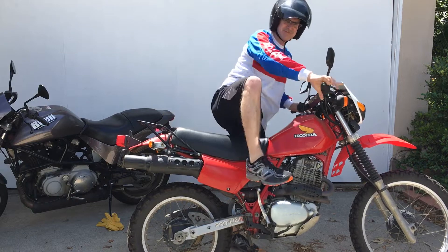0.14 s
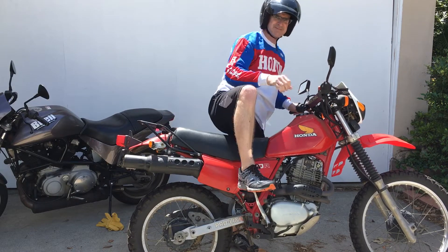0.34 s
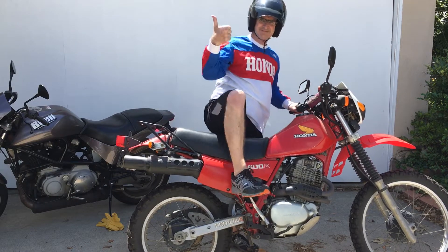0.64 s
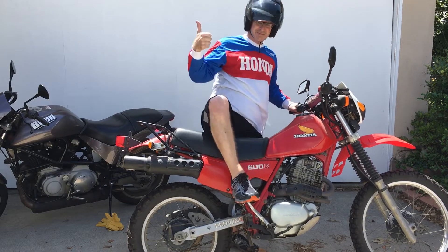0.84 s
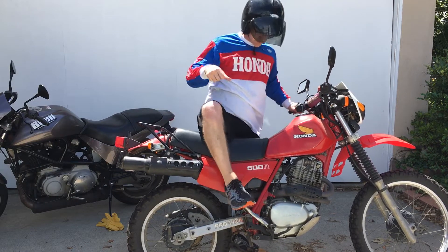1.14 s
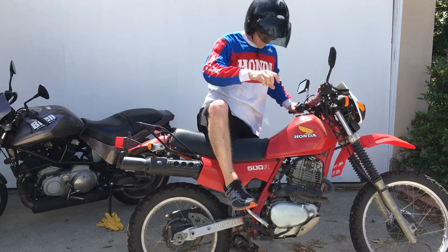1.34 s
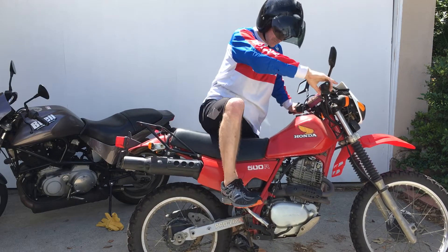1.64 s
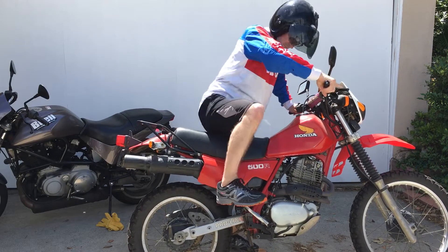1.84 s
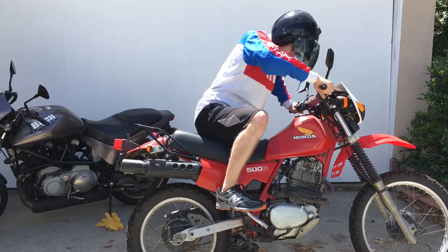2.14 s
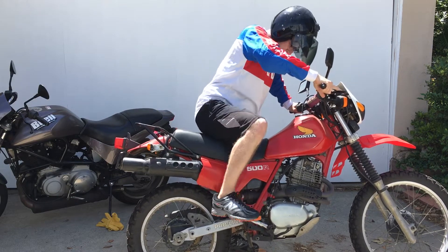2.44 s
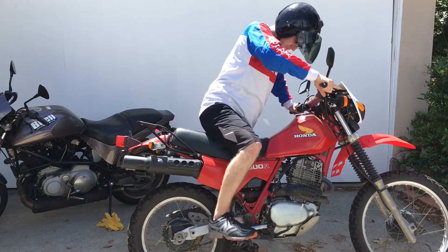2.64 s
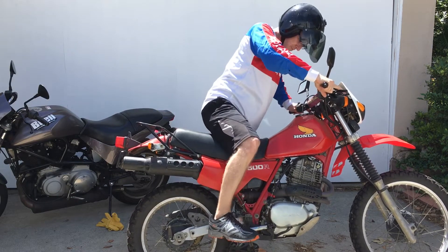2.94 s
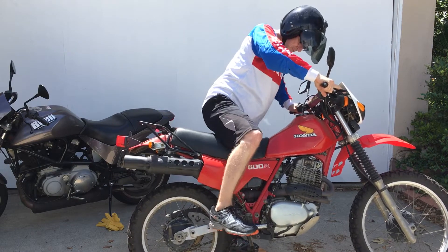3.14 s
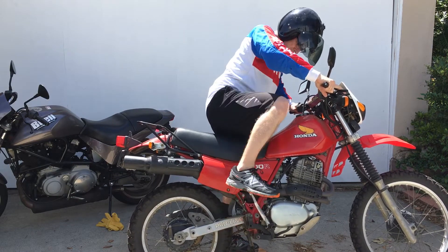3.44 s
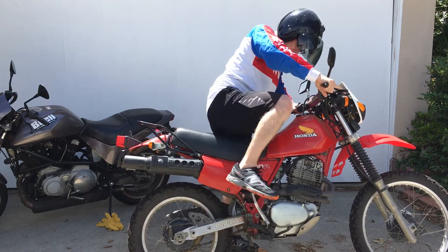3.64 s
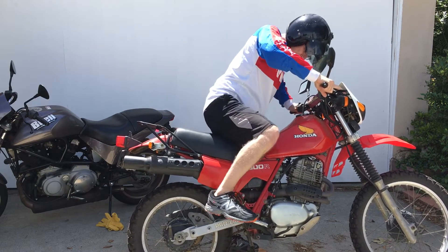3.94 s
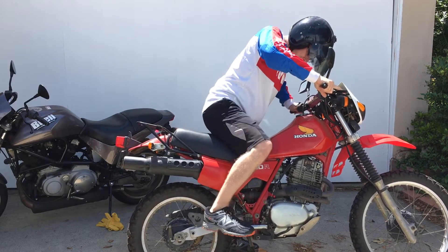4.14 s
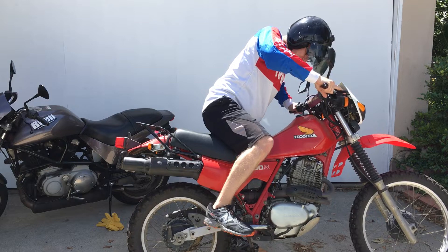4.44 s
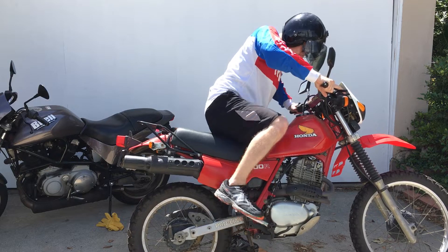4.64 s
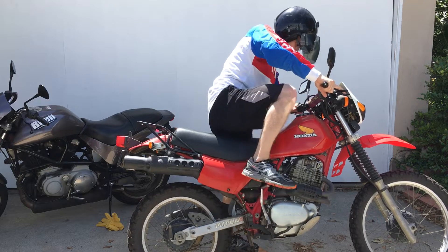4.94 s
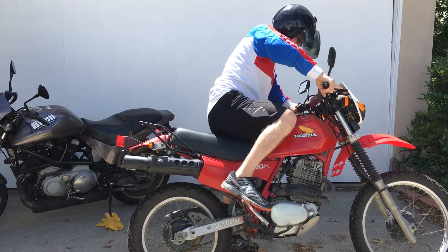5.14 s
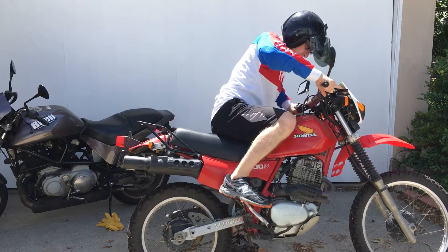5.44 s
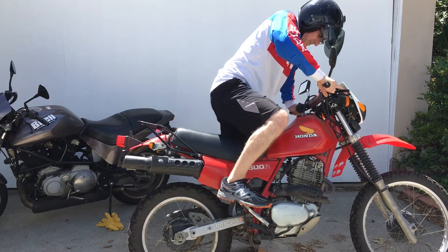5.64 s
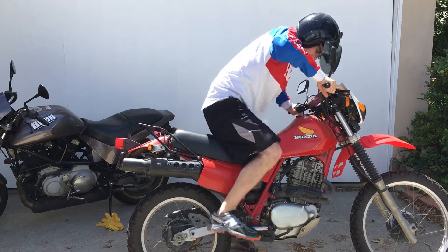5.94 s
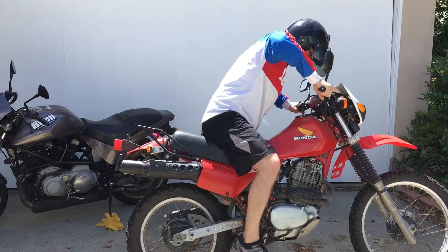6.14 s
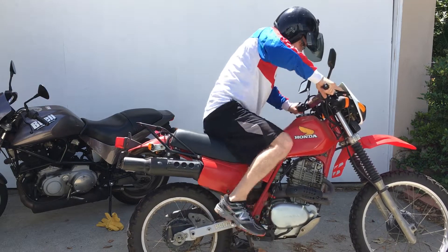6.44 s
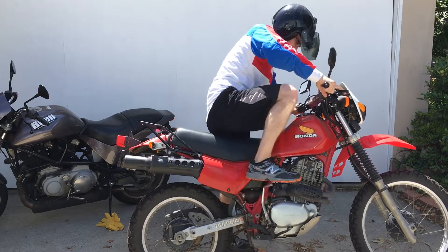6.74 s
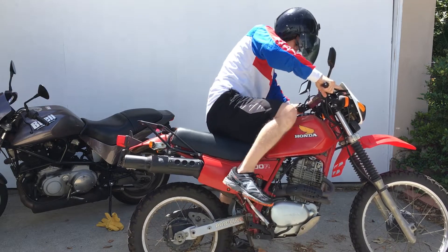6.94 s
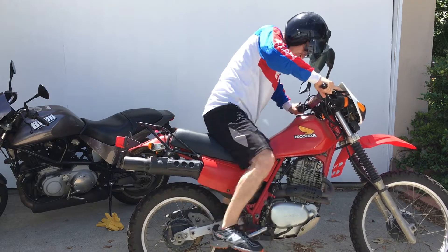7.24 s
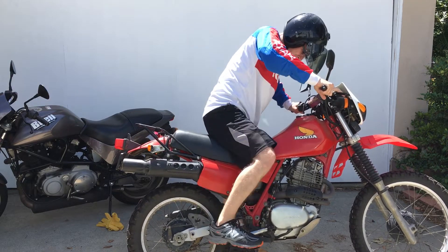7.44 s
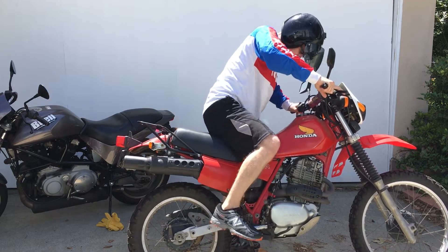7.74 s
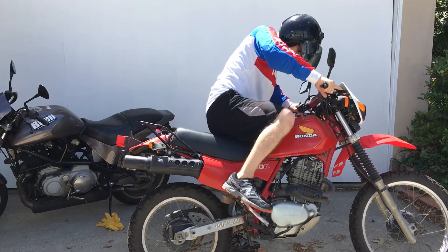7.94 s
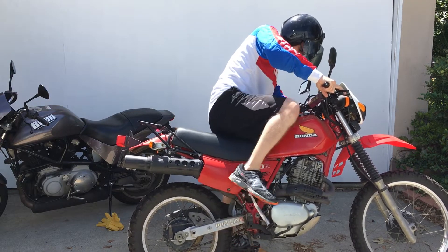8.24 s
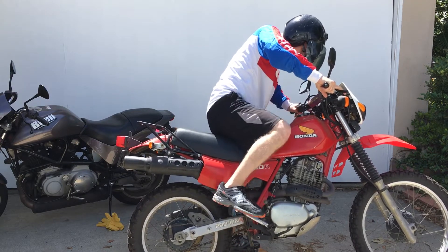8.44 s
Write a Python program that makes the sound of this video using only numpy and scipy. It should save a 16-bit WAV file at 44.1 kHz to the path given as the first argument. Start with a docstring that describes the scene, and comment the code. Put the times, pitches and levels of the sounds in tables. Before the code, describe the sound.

Close outdoor sound by a garage door. Soft wind and faint bird chirps with tiny rubs and ticks first, then a motorcycle kick lever is pushed down: metallic knock and short gear churn, ratchet clicks, sharp clack at the top. It repeats, then one very hard clanging kick rattles the frame, followed by another knock, churn and clack. The engine never fires. Gusts thump low on the microphone; short hard echoes.

```python
"""In front of a garage door, a rider works the kick-starter of a cold single-cylinder motorcycle; it never fires.
Starter gears, lever stops, ratchet and loose fittings are short noise bursts with ringing parts and yard echoes.
Churning gears, wheezing ports, scuffs and a rattle are shaped noise; jolts ring tank and pipe as low sines.
Wind buffets the microphone as slow and fluttering noise over an outdoor hush; birds are falling sine chirps."""
import sys
import numpy as np
from scipy import signal
from scipy.fft import rfft, irfft, next_fast_len
from scipy.io import wavfile
from scipy.ndimage import uniform_filter1d, map_coordinates

SR = 44100
rng = np.random.default_rng(int(sys.argv[2]) if len(sys.argv) > 2 else 0)


def waveform_to_disk(signal):
    """Save audio, clipped to [-1, 1], as 16-bit WAV at the path in sys.argv[1]."""
    frames = np.transpose(np.atleast_2d(signal))
    scaled = np.clip(frames, -1, 1) * 32767
    samples = np.round(scaled).astype(np.int16)
    wavfile.write(sys.argv[1], SR, samples)


N = 379260

# Wind strength over time. Each row: time in seconds, relative strength in dB.
WIND_STRENGTH = [(0.0, -40), (0.42, -44), (1.02, -35.5), (1.18, -48.5), (1.64, -43), (2.0, -32),
                 (3.079, -44), (3.9, -18.5), (4.62, -36), (4.92, -28.5), (5.12, -51), (5.36, -22.5),
                 (5.521, -37.5), (5.68, -24.5), (5.86, -29.5), (6.08, -24.5), (6.52, -36.5), (6.76, -17),
                 (6.88, -32.5), (8.54, -23.5)]
# Slow pressure swings at the microphone. Each row: frequency in Hz, relative density in dB per Hz.
BUFFET_SPECTRUM = [(1, -6), (3, 1), (10, 9.5), (16, -4.5), (24, -23), (45, -54.5), (130, -110)]
# Faster wind flutter. Each row: frequency in Hz, relative density in dB per Hz.
FLUTTER_SPECTRUM = [(12, -13), (22, 3), (31, -1.5), (39, -9), (50, -14), (62, -22), (80, -26.5), (110, -43),
                    (180, -70), (900, -100)]
# Steady outdoor hush. Each row: frequency in Hz, relative density in dB per Hz.
HUSH_SPECTRUM = [(59, -24.5), (100, 0.5), (177, -2), (239, -8), (350, -11), (768, -16), (836, -16.5),
                 (1330, -21), (2220, -28.5), (4570, -28.5), (6840, -40.5), (15000, -44), (16000, -55.5)]
USUAL_WIND_DB = -30  # gusts are counted from this strength

# Far birds in the hedge. Each row: mid-chirp time in seconds, pitch in Hz, half length in seconds,
# level in dB before the yard smears it.
CHIRPS = [(0.217, 4930, 0.039, -74), (0.52, 3140, 0.14, -70), (0.63, 2920, 0.042, -71),
          (0.757, 4600, 0.074, -72), (0.992, 3330, 0.068, -69), (1.376, 4580, 0.029, -66),
          (1.42, 3300, .06, -65), (1.52, 4320, 0.063, -73), (2.331, 5000, 0.023, -62),
          (2.343, 3580, .05, -63), (3.007, 4360, 0.051, -61)]
# Echo decay of the yard. Each row: frequency in Hz, time to fall 60 dB in seconds.
YARD_T60 = [(150, 0.52), (600, 0.28), (2000, 0.3), (4500, 0.26), (12000, 0.22)]
# Echo colour of the yard. Each row: frequency in Hz, relative gain in dB.
YARD_GAIN = [(150, 11), (500, 10), (1200, 5), (3000, -3), (5000, 6.5), (12000, 2)]

# Hand levers and loose fittings tick. Each row: contact time in seconds, relative level in dB, brightness in dB.
TICK_HITS = [(0.348, -45, -11), (1.635, -47.5, -4), (1.692, -43.5, -1), (2.406, -39.5, -2.5),
             (2.547, -38, 4), (2.594, -24.5, 5.5), (5.401, -41.5, -6.5), (5.68, -45, -2.5), (6.24, -25, 6),
             (6.89, -40, -12), (7.182, -43, 0)]
# Slack in the starter gears closes; the first row is a dull knock of a hand on the tank or handlebar. # Each
# row: contact time in seconds, relative level in dB, brightness in dB.
MESH_HITS = [(1.143, -36.5, -8), (3.544, -32, -2), (3.659, -38, 1.5), (3.731, -26.5, -2), (3.769, -26, 1),
             (4.867, -35, 1.5), (5.07, -35.5, 4), (5.129, -32, -5), (5.169, -33, -3), (6.7, -24.5, 2.5),
             (6.932, -34.5, 3.5), (7.017, -30.5, 2), (8.107, -31, -1), (8.264, -37.5, 6),
             (8.316, -36.5, 5.5), (8.392, -27.5, -3)]
# The lever lands on its bottom stop. Each row: contact time in seconds, relative level in dB, brightness in dB.
BOTTOM_HITS = [(2.601, -18, 3), (4.113, -19, 0.5), (6.112, -11.5, -1.5), (7.253, -16.5, 1.5)]
# Ratchet teeth slip on the way up. Each row: contact time in seconds, relative level in dB, brightness in dB.
RATCHET_HITS = [(3.21, -40.5, -5.5), (3.232, -44.5, -5), (3.368, -24.5, 0.5), (3.438, -21, 4.5),
                (4.601, -42, -5), (4.699, -29, -0.5), (4.775, -31, 2.5), (6.412, -27.5, 1.5),
                (6.488, -27.5, 1), (6.563, -29, -1.5), (6.627, -31, 5), (7.798, -36, 0.5),
                (7.912, -28, -1.5), (7.984, -21.5, 9.5)]
# The lever springs against its top stop. Each row: contact time in seconds, relative level in dB, brightness in dB.
TOP_HITS = [(3.503, -15.5, 0), (4.823, -14.5, 1.5), (6.671, -13.5, 0), (8.064, -13, -0.5)]
# The hard kick jolts the engine. Each row: contact time in seconds, relative level in dB, brightness in dB.
KICK_HITS = [(6.0046, -1, 3), (6.19, -25.5, -8.5), (6.265, -23.5, -3)]

# Colour of the ratchet and of the ticks. Each row: frequency in Hz, relative density in dB per Hz.
RATCHET_TONE = [(180, -71), (300, -11.5), (1280, 1.5), (1480, 1.5), (2210, 1), (3130, -3), (3520, -4),
                (4590, -4), (5340, -12), (8360, -21), (11500, -19.5), (16000, -45)]
# Colour of the gears meshing. Each row: frequency in Hz, relative density in dB per Hz.
MESH_TONE = [(120, -30), (200, -10), (719, -5), (844, -6), (1080, 0), (1360, -2.5), (2170, -5), (2780, -12),
             (4650, -17), (7650, -45.5), (14000, -57)]
# Colour of the bottom stop. Each row: frequency in Hz, relative density in dB per Hz.
BOTTOM_TONE = [(88, -42.5), (150, -11), (209, -5.5), (368, -12.5), (612, -4), (854, -4.5), (1560, 2),
               (2000, 3), (2270, 1.5), (2650, 3), (4580, 2.5), (4950, 1), (6140, -11.5), (11300, -8.5),
               (16000, -24.5)]
# Colour of the top stop. Each row: frequency in Hz, relative density in dB per Hz.
TOP_TONE = [(180, -57), (300, -27.5), (725, -13), (885, -18.5), (1030, -5), (1210, -14.5), (1580, 0),
            (1840, -11.5), (2170, -7.5), (3580, 2.5), (4440, -3), (4830, -9.5), (6740, -19), (9550, -15),
            (16000, -37)]
# Colour of the hard kick and of the rattle. Each row: frequency in Hz, relative density in dB per Hz.
KICK_TONE = [(60, -21), (130, -8.5), (300, -2), (560, -11), (700, 1), (1000, 0.5), (1700, 1), (2050, 0.5),
             (2500, -3.5), (4000, -7), (5000, -9.5), (6000, -21.5), (7500, -24.5), (10500, -19.5),
             (16000, -35)]
# A clean, square contact is brighter. Each row: frequency in Hz, tilt in dB per dB of brightness.
BRIGHTNESS_TILT = [(450, -1.07), (1000, -0.58), (2000, 0), (3300, 0.5), (7000, 0.85)]

# Ringing engine case. Each row: frequency in Hz, width in Hz, relative level in dB.
CASE_MODES = [(749, 23, 8), (1130, 570, -4), (1326, 17, 6.5), (1564, 90, -6), (2300, 190, -5.5),
              (2890, 140, -5), (3500, 68, -1), (3965, 60, -4.5), (4570, 200, -11.5), (4850, 100, -10)]
# Ringing frame. Each row: frequency in Hz, width in Hz, relative level in dB.
FRAME_MODES = [(635, 56, 3.5), (980, 42, -5), (1200, 21, -4.5), (1310, 22, -2.5), (1620, 150, -0.5),
               (1870, 70, 3.5), (2176, 77, 5.5), (2660, 65, -1.5), (2800, 83, 1.5), (3040, 70, 0.5),
               (3570, 71, 7), (3915, 49, 6), (4360, 36, 1.5), (4850, 62, -2.5), (5240, 71, 3.5)]
# Ringing kick lever. Each row: frequency in Hz, width in Hz, relative level in dB.
LEVER_MODES = [(750, 30, -8), (1009, 30, -1), (1480, 60, -10.5), (2270, 63, -12.5), (2640, 99, -6),
               (2960, 47, -12), (3410, 29, -4), (3556, 48, -3), (3630, 91, -4), (4020, 54, -10),
               (4310, 62, -5.5), (4400, 27, -5.5), (9200, 120, -26)]

# The bike takes a jolt. Each row: time in seconds, most excited frequency in Hz, spread in octaves, drive in dB.
JOLTS = [(1.15, 560, 0.36, -22), (2.606, 290, 0.35, -14), (5.171, 450, 0.71, -26), (6.005, 255, 1.9, 5.5),
         (6.115, 563, 0.38, 0.5), (6.701, 740, 0.19, -6.5), (7.254, 320, 0.45, -8), (8.396, 632, 0.29, -16)]
# Low ringing of tank and pipe. Each row: frequency in Hz, relative level in dB, time to fall 60 dB in seconds.
BOOM_MODES = [(144, -30, 0.39), (283, -41.5, 0.73), (322.7, -36.5, .28), (492, -33, .35),
              (650, -25.5, 0.13), (738, -28, 0.24), (815, -35.5, .35)]
# Hands, shoe and clothes brush the bike. Each row: peak time in seconds, centre in Hz, fade time constant
# in seconds, level in dB.
SCUFFS = [(1.152, 1300, 0.016, -48), (1.161, 450, 0.025, -49), (1.875, 4200, 0.035, -51),
          (6.705, 748, 0.028, -44), (1.895, 1140, 0.034, -54.5), (2.035, 1050, 0.066, -51.5),
          (2.03, 350, 0.044, -56), (2.03, 3000, 0.11, -62), (2.19, 4500, 0.076, -67),
          (2.9, 2400, .2, -66.5), (5.968, 2400, .079, -49), (5.975, 8000, .06, -61.5),
          (5.978, 600, .074, -47.5), (7.225, 3220, 0.018, -41.5), (7.285, 330, .05, -42)]

# The engine turns over, loudest at the time given. Each row: time in seconds, relative churn level in dB.
STROKES = [(2.591, -46.5), (4.114, -52), (6.171, -45), (7.265, -40)]
# Colour of the gears and chain. Each row: frequency in Hz, relative density in dB per Hz.
CHURN_SPECTRUM = [(71, -40.5), (120, -11.5), (316, -0.5), (377, -2.5), (655, -5), (881, -8), (1050, -5.5),
                  (1530, -15.5), (1800, -13), (3000, -15), (3900, -50), (6600, -120)]
SPIN_UP_S, SPIN_DOWN_S = 0.083, 0.091  # time constants of the churn
# A faint wheeze as the piston creeps on. Each row: time it reaches full level in seconds, hold in seconds,
# level in dB.
WHEEZES = [(3.823, 0.23, -61), (4.209, 0.094, -58.5), (7.491, 0.21, -62)]
# Resonances of the ports. Each row: frequency in Hz, width in Hz, relative level in dB.
PORT_MODES = [(1303, 16, -0.5), (1550, 140, -3.5), (1996, 71, -3.5), (2390, 240, -14.5), (3370, 120, -9),
              (4070, 350, -15.5)]
WHEEZE_RISE_S, WHEEZE_FADE_S = 0.03, 0.094  # time constants

RATTLE_S, RATTLE_DB, RATTLE_FADE_S = 6.035, -37, 0.025  # the first shake after the hard kick
SETTLE_HOLD_S, SETTLE_DB, SETTLE_FADE_S = 0.25, -48, 0.04  # the parts go on tapping, then come to rest
TOP_HZ = 16200  # band limit of the recorder


def amp(db):
    """Decibels to gain."""
    return 10 ** (np.asarray(db) / 20)


def unit(x):
    """Scale to rms 1."""
    return x / np.sqrt(np.mean(x ** 2) + 1e-20)


def along(points, hz):
    """Read (Hz, value) points on a log frequency axis."""
    f, v = np.transpose(points)
    return np.interp(np.log(hz + 1), np.log(f + 1), v)


def wobble(rate):
    """A smooth random curve, rate knots a second."""
    knots = rng.standard_normal(int(N * rate / SR) + 4)
    return map_coordinates(knots, [np.arange(N) * rate / SR])


def swell(peak_s, rise_s, hold_s, fade_s):
    """An envelope that climbs exponentially to 1 at peak_s, holds, then fades exponentially."""
    t = np.arange(N) / SR - peak_s
    return np.exp(np.minimum(t, 0) / rise_s - np.maximum(t - hold_s, 0) / fade_s)


def filtered(x, response):
    """Shape x by a response given as a function of frequency."""
    m = 2 * next_fast_len(len(x) // 2 + 4096)
    return irfft(rfft(x, m) * response(np.fft.rfftfreq(m, 1 / SR)), m)[:len(x)]


def noise(spectrum):
    """Coloured noise of rms 1."""
    return unit(filtered(rng.standard_normal(N), lambda hz: amp(along(spectrum, hz))))


def causal(db):
    """The minimum-phase response with this dB curve, so that nothing sounds before the blow."""
    cepstrum = irfft(db * np.log(10) / 20)
    half = len(cepstrum) // 2
    cepstrum[1:half] *= 2
    cepstrum[half + 1:] = 0
    return np.exp(rfft(cepstrum))


def resonances(modes, f):
    """Summed response of (Hz, width, dB) modes, with alternating signs."""
    total = 0
    for k, (centre, width, db) in enumerate(modes):
        peak = 1j * f * width / (centre * centre - f * f + 1j * f * width)
        total = total + (-1) ** k * amp(db) * peak
    return total


def yard(size):
    """A fresh scattered answer of the bike, the concrete and the garage door: noise decaying band by band."""
    hz, t, bands = signal.stft(rng.standard_normal(size), SR, nperseg=128)
    decay = amp(along(YARD_GAIN, hz)[:, None] - 60 * t / along(YARD_T60, hz)[:, None])
    build_up = 1 - np.exp(-t / 0.0032)
    tail = signal.istft(bands * decay * build_up, SR, nperseg=128)[1][:size]
    return tail / np.linalg.norm(tail)


def contacts(rows, tone, modes, chatter_s, scrape_s, scrape_db, ring_db, yard_db, level_db):
    """Steel slides, hits and chatters for a few ms; the part rings and the yard answers."""
    size, lead = 16384, SR // 50  # samples; the lead leaves room for the scrape before the hit
    t = (np.arange(size) - lead) / SR
    hz = np.fft.rfftfreq(size, 1 / SR)
    scrape = amp(scrape_db) * np.exp(-abs(t) / scrape_s)
    pressure = np.where(t < 0, scrape, np.exp(-abs(t) / chatter_s))
    body = causal(np.maximum(along(tone, hz), -60))
    body = body / np.linalg.norm(body)
    ring = resonances(modes, hz)
    ring = ring / np.linalg.norm(ring)
    crack = amp(-5) * 1j * hz / (7000 + 1j * hz)  # the first touch is the sharpest: a click above 7 kHz
    to_hit = np.exp(-2j * np.pi * hz * lead / SR)  # delay to the moment of contact
    out = np.zeros(N + SR)
    for s, db, bright_db in rows:
        chatter = pressure * rng.standard_normal(size)
        chatter = body * rfft(chatter) / np.linalg.norm(chatter)
        echo = amp(yard_db) * rfft(yard(size))
        after = body * (crack + echo) + amp(ring_db) * ring * (1 + echo)
        tilt = causal(bright_db * along(BRIGHTNESS_TILT, hz))
        hit = irfft(tilt * (chatter + after * to_hit))
        # equal energy for each hit, scaled to the chatter length
        gain = amp(db + level_db) * np.sqrt(SR * chatter_s) / np.linalg.norm(hit)
        out[round(s * SR) - lead:][:size] += gain * hit
    return out[:N]


def eddies(spectrum, size):
    """Turbulent pressure whose strength is evened out over size samples."""
    x = noise(spectrum)
    return x / np.sqrt(uniform_filter1d(x ** 2, size) + 0.02)


def wind():
    """One wind strength drives a slow buffet and an uneven flutter on the microphone, over an outdoor hush."""
    gust_db = np.interp(np.arange(N) / SR, *np.transpose(WIND_STRENGTH)) - USUAL_WIND_DB
    # flutter grows faster with the gusts than the buffet does
    buffet = amp(-18.5 + 0.5 * gust_db) * eddies(BUFFET_SPECTRUM, size=9000)
    flutter_db = -27.5 + 1.105 * gust_db + 1.34 * wobble(8.1)
    flutter = amp(flutter_db) * eddies(FLUTTER_SPECTRUM, size=6000)
    hush = amp(-57 + 1.5 * wobble(2.2)) * noise(HUSH_SPECTRUM)
    return buffet + flutter + hush


def birds(fall=0.0387, warble=0.058):
    """Short falling sine chirps with a random warble, smeared by distance; both settings are pitch fractions."""
    t, flutter = np.arange(N) / SR, wobble(700)
    song = np.zeros(N)
    for s, hz, half_length, db in CHIRPS:
        near = abs(t - s) < half_length
        u = (t[near] - s) / half_length  # -1 to 1 through the chirp
        pitch = hz * (1 - fall * u + warble * flutter[near])
        phase = 2 * np.pi * np.cumsum(pitch) / SR
        song[near] += amp(db) * np.cos(np.pi * u / 2) ** 2 * np.sin(phase)
    return signal.fftconvolve(song, yard(SR // 2))[:N]


def ticks():
    """Hand levers and loose fittings tick lightly, with the ratchet's colour and the case's ring."""
    return contacts(TICK_HITS, RATCHET_TONE, CASE_MODES, chatter_s=0.006, scrape_s=0.0042,
                    scrape_db=-22.5, ring_db=-18, yard_db=0, level_db=-8)


def gear_mesh():
    """Starter gears close their slack, and a hand knocks the tank once: each a long scrape and a dull knock
    that rings the case."""
    return contacts(MESH_HITS, MESH_TONE, CASE_MODES, chatter_s=0.0098, scrape_s=0.0068,
                    scrape_db=-8.5, ring_db=-10.5, yard_db=-5, level_db=-7.5)


def boom():
    """Jolts set the tank and the exhaust pipe ringing low; each jolt favours the modes near its own pitch."""
    t, out = np.arange(SR) / SR, np.zeros(N + SR)
    build_up = 1 - np.exp(-t / 0.0019)
    for s, centre, spread, jolt_db in JOLTS:
        for hz, db, t60 in BOOM_MODES:
            share = np.exp(-0.5 * (np.log2(hz / centre) / spread) ** 2)
            decay = amp(jolt_db + db - 60 * t / t60)
            ring = decay * np.sin(2 * np.pi * (hz * t + rng.random()))
            out[round(s * SR):][:SR] += share * ring * build_up
    return out[:N]


def scuffs(grain_db=3, width=0.49, rise_s=0.0091):
    """Hands, shoe and clothes rub: each scuff is a grainy band of noise that starts quickly and fades."""
    out = np.zeros(N)
    rubbing = rng.standard_normal(N) * amp(grain_db * wobble(150))
    for s, hz, fade, db in SCUFFS:
        mode = [(hz, 2 * width * hz, 0)]
        band = unit(filtered(rubbing, lambda f: resonances(mode, f) ** 3))
        out += amp(db) * swell(s, rise_s, 0, fade) * band
    return out


def engine_churn(level_db=-2, rough_db=3):
    """Gears and chain churn as rough noise that swells and dies with each stroke."""
    strength = sum(amp(db) * swell(s, SPIN_UP_S, 0, SPIN_DOWN_S) for s, db in STROKES)
    gears = unit(noise(CHURN_SPECTRUM) * amp(rough_db * wobble(90)))
    return amp(level_db) * strength * gears


def bottom_stop():
    """The lever lands on its bottom stop at the end of a stroke and rings the frame."""
    return contacts(BOTTOM_HITS, BOTTOM_TONE, FRAME_MODES, chatter_s=0.0073, scrape_s=0.0016,
                    scrape_db=-8, ring_db=-14.5, yard_db=-6, level_db=-4)


def ratchet():
    """Ratchet teeth slip as the lever comes back up, ringing the case."""
    return contacts(RATCHET_HITS, RATCHET_TONE, CASE_MODES, chatter_s=0.008, scrape_s=0.0022,
                    scrape_db=-13.5, ring_db=-7, yard_db=-4.5, level_db=-5)


def top_stop():
    """The lever springs against its top stop in a short clack and rings itself."""
    return contacts(TOP_HITS, TOP_TONE, LEVER_MODES, chatter_s=0.0028, scrape_s=0.0011,
                    scrape_db=-32, ring_db=-6.5, yard_db=-8.5, level_db=-3)


def wheeze(drift=0.023):
    """The piston pushes air through the ports: resonant noise, read at a drifting speed so its pitch glides."""
    strength = sum(amp(db) * swell(s, WHEEZE_RISE_S, hold, WHEEZE_FADE_S) for s, hold, db in WHEEZES)
    air = rng.standard_normal(N)
    ports = unit(filtered(air, lambda f: resonances(PORT_MODES, f) / (1 + (f / 5000) ** 4)))
    # the port resonances glide as the valves move
    ports = map_coordinates(ports, [np.cumsum(1 + drift * wobble(6.3))], mode="wrap")
    return strength * ports


def hard_kick():
    """The hard kick jolts the engine: a heavy blow with a strong ring of the frame."""
    return contacts(KICK_HITS, KICK_TONE, FRAME_MODES, chatter_s=0.0075, scrape_s=0.0005,
                    scrape_db=-17.5, ring_db=-5, yard_db=-5.5, level_db=-5)


def rattle(spiky_db=7, rise_s=0.022):
    """Loose parts tap the frame: noise with quick, uneven bursts in the colour of the kick."""
    taps = rng.standard_normal(N) * amp(spiky_db * np.minimum(wobble(250), 2))
    shake = amp(RATTLE_DB) * swell(RATTLE_S, rise_s, 0, RATTLE_FADE_S)
    settle = amp(SETTLE_DB) * swell(RATTLE_S, rise_s, SETTLE_HOLD_S, SETTLE_FADE_S)
    return (shake + settle) * unit(filtered(taps, lambda f: amp(along(KICK_TONE, f))))


def scene():
    """Bike, rider, birds and weather at one microphone."""
    surroundings = wind() + birds()
    starter = ticks() + gear_mesh() + bottom_stop() + ratchet() + top_stop() + hard_kick()
    bike = boom() + engine_churn() + wheeze() + rattle()
    return (surroundings + starter + bike + scuffs())[None]


def record(dry):
    """The recorder rounds off peaks at full scale and cuts steeply above its band limit."""
    limited = dry[0] / (1 + abs(dry[0]) ** 8) ** (1 / 8)
    return filtered(limited, lambda hz: 1 / np.sqrt(1 + (hz / TOP_HZ) ** 200))[None]


dry = scene()
out = record(dry)
waveform_to_disk(out)
```